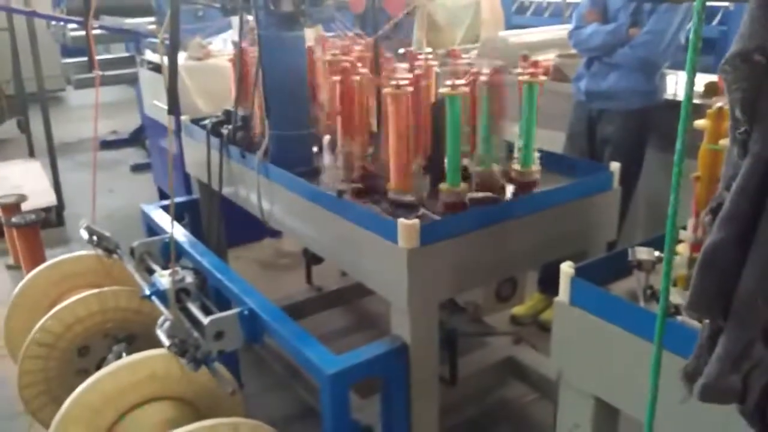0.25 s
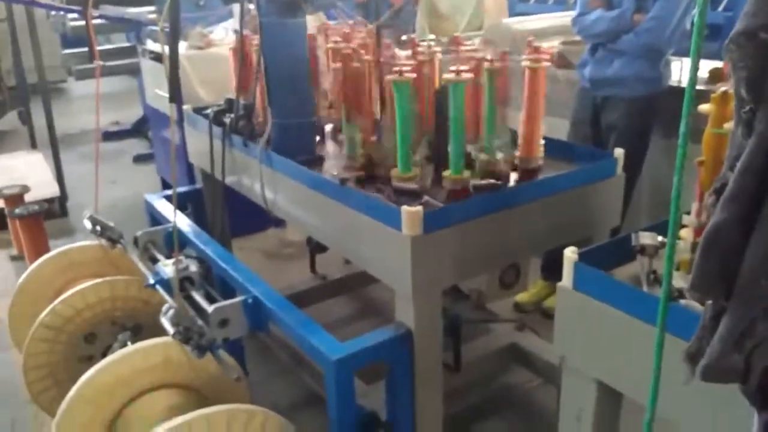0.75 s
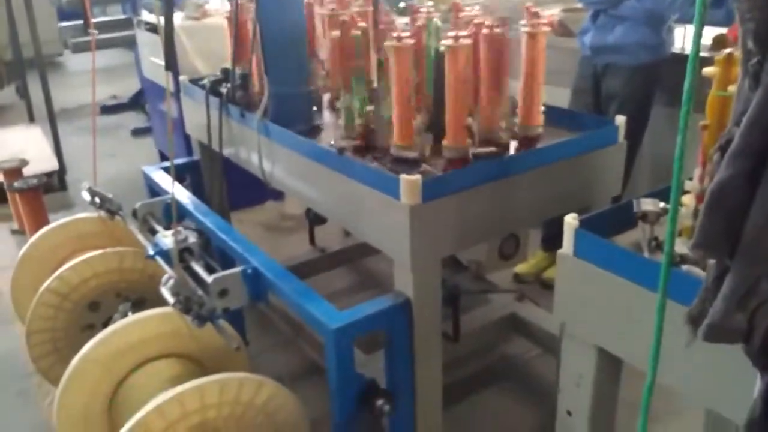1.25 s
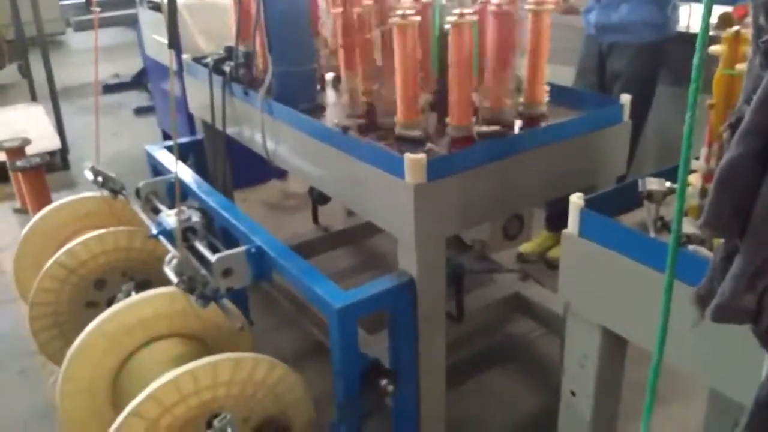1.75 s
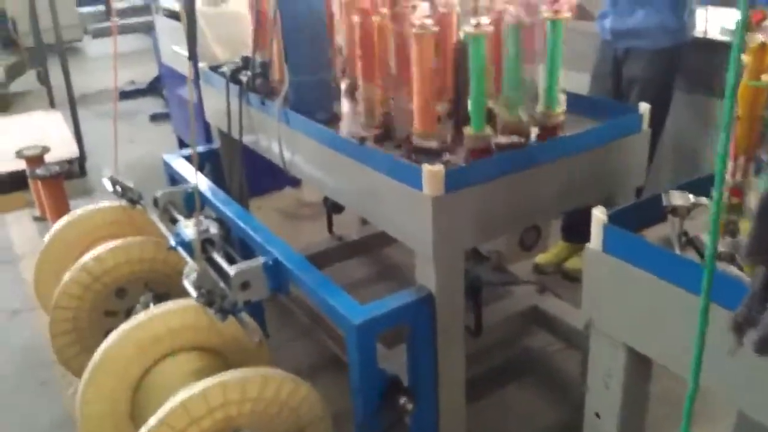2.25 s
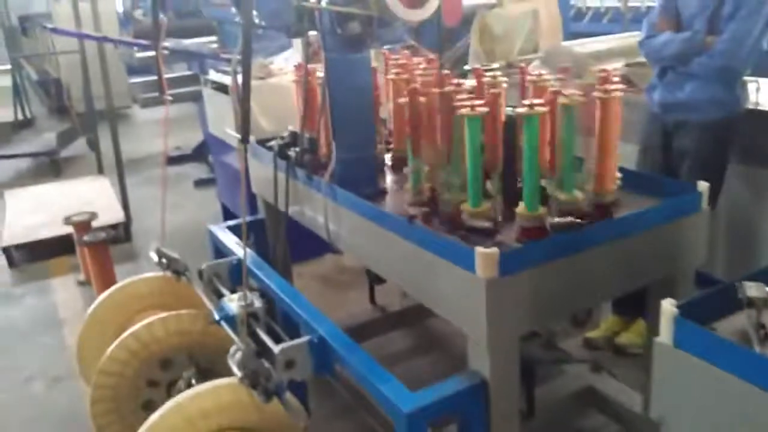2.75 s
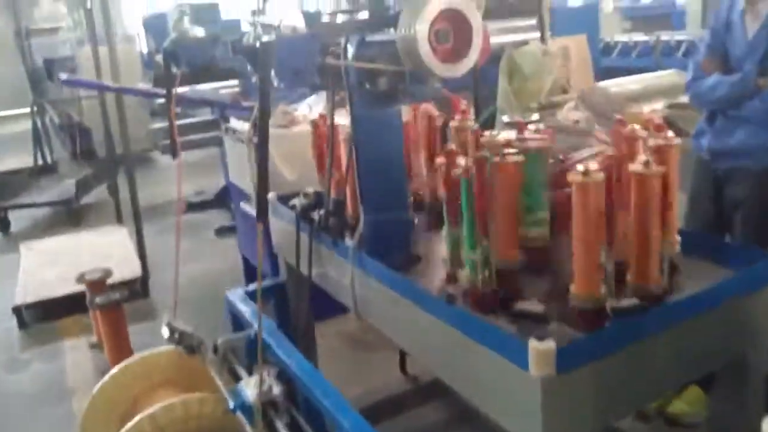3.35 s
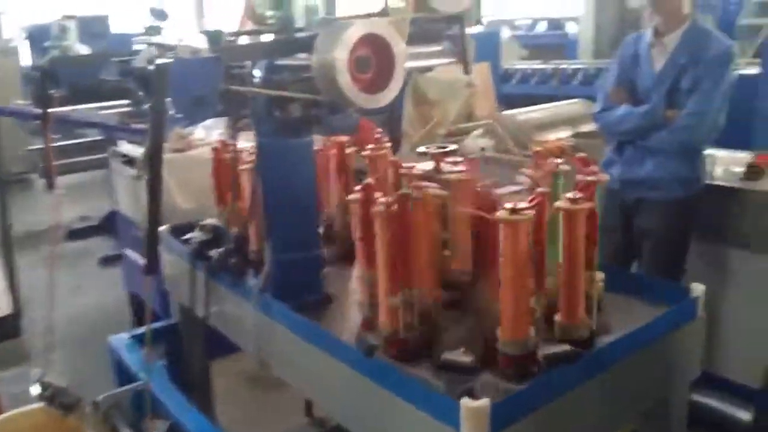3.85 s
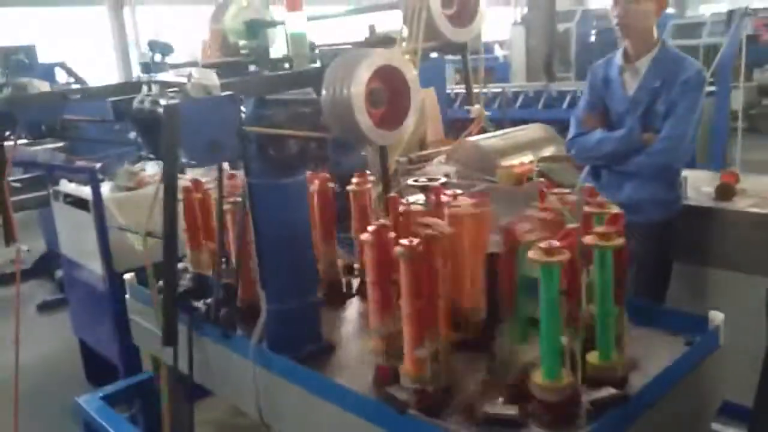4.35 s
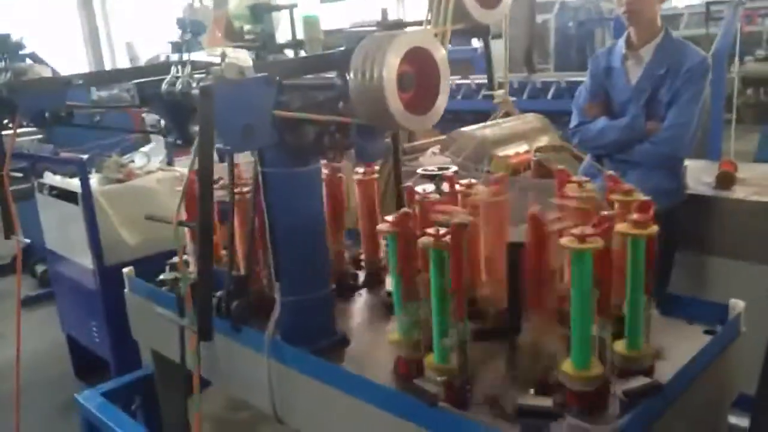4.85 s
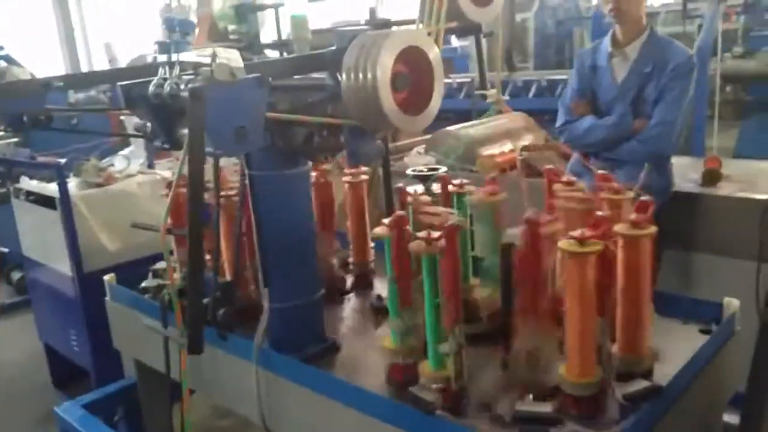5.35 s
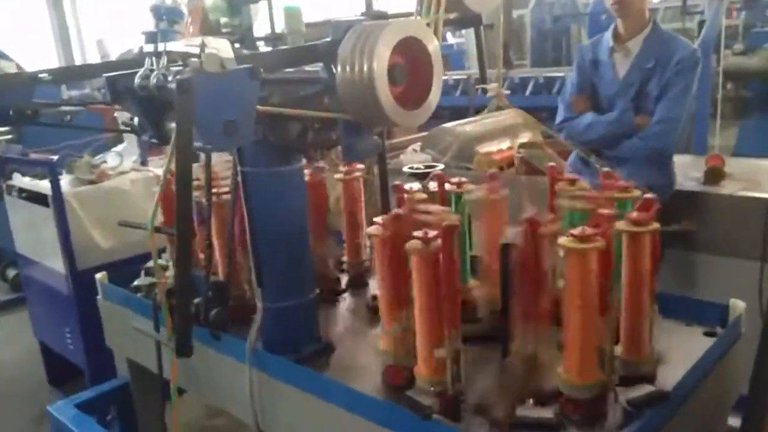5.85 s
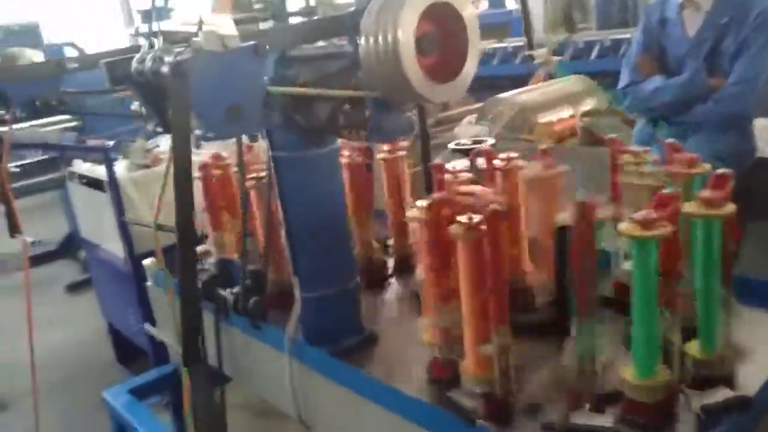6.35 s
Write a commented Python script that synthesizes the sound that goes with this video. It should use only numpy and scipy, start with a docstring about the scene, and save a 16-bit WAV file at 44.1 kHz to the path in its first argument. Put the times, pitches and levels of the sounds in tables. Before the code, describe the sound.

Loud, dense mechanical din in a hall of running braiding machines. Loose steel parts knock and ring in a quick regular pulse, with hissy metal scraping, bright clanks and occasional faint spindle squeals. Beneath lies a wavering drone with booms and soft thumps. The noise never stops; as the microphone is carried toward the machine, clatter, scrape and throb come forward over the background roar.

```python
"""In a factory hall, rope braiding machines run at full speed; the microphone is carried up to one of them.
Its horn gears hand the bobbin carriers on six times a second: random contacts ring the steel as clatter
and bright scraping, and bobbins rattle, spindles sing and slots knock through resonances.
The deck plate booms from driven modes and wandering sines, dull thuds follow the drops, the drive gears hum
as an uneven tone, and the other machines fill the hall with a steady din of coloured noise."""
import sys
import numpy as np
from scipy import signal
from scipy.fft import rfft, irfft, next_fast_len
from scipy.io import wavfile
from scipy.ndimage import uniform_filter1d

SR = 44100
rng = np.random.default_rng(int(sys.argv[2]) if len(sys.argv) > 2 else 0)


def int16_out(signal):
    """Quantize to a 16-bit WAV file."""
    q = np.round(np.clip(np.atleast_2d(signal).T, -1, 1) * 32767)
    wavfile.write(sys.argv[1], SR, q.astype(np.int16))


N = 291060
TIME = np.arange(N) / SR
FREQS = np.maximum(np.arange(N // 2 + 1) * SR / N, 1)

HANDOVERS_PER_S = 6.077
ACCENT_EVERY = 3  # handovers
MESH_HZ = 362.92
CUTOFF_HZ = 14150
TURN = TIME * HANDOVERS_PER_S % 1  # share of the handover cycle

# In every handover the carriers catch in the gear slots.
# Each row: share of the cycle, relative impact in dB, relative gear load in dB.
CATCHES = [(0.132, 2, 1), (0.44, 1.5, -1.5), (.66, -9, -3)]


def clatter(near, far_db=-19.5, closer_db=-1.2, knock_db=-3.0, ring_db=-5.0, catch_db=-4.0, catch_t60=0.68):
    """Loose carriers knock in the track and set the steel parts ringing; the catches drive them harder."""
    # Modes of carriers, spindles and track. Each row: Hz, width in Hz, relative dB from afar, and close by.
    steel_modes = [(859, 60, -7.5, -4.5), (953, 76, -10.5, -2), (1181, 46, -5.5, -7.5),
                   (1266, 25, -1.5, -14), (1361, 32, -7.5, 1), (1508, 120, -18, 5.5), (2086, 45, -23, -19),
                   (2312, 50, -7.5, -6), (4160, 83, -10.5, -13.5)]
    # Colour of the knocks. Each row: Hz, relative level in dB per Hz.
    knock_colour = [(150, -36), (220, -4.5), (420, -1), (600, -4.5), (800, 2), (1050, -2.5), (1350, 6),
                    (1620, 5.5), (1900, 2), (2450, -0.5), (3000, -4), (3700, -5), (5000, -9), (9000, -45)]
    touches = contacts(per_s=750, spread_db=3.0, t60=.06, patchy_db=11.0, surge_db=3.0, count=8)
    taps = from_db(-3.0) * pings(per_s=200, low_hz=800, high_hz=2800, t60=.1)
    knocks = colour(touches, knock_colour) + taps
    rings = body(noise(), steel_modes, near, flicker_db=2.9)

    jolts = from_db(catch_db) * blows(catches(uneven_db=-2.0, late_s=0.015))
    force = from_db(far_db + closer_db * near) * np.hypot(1, dying(jolts ** 2, catch_t60))
    return force * (from_db(knock_db) * knocks + from_db(ring_db) * rings)


def scrape(near, slide_db=-47.5, drag_db=-34, drag_t60=0.46, closer_db=6.5):
    """Carrier feet chatter along the track, drag hard after each catch and ease off, with bright clanks."""
    # Colour of the steel scrape. Each row: Hz, relative level in dB per Hz.
    scrape_colour = [(1500, -19), (3000, 11.5), (4800, -0.5), (6500, 1), (8500, -3.5), (11000, -2.5),
                     (14000, -9)]
    touches = contacts(per_s=1300, spread_db=3.0, t60=.03, patchy_db=7.5, surge_db=3.0, count=10)
    taps = from_db(-4.5) * pings(per_s=300, low_hz=4400, high_hz=14000, t60=.07)
    grabs = blows(catches(uneven_db=0.8, late_s=0.006, accent_db=0.5))
    drag = uniform_filter1d(dying(grabs ** 2, drag_t60), int(.02 * SR))
    force = from_db(closer_db * near) * np.hypot(from_db(slide_db), from_db(drag_db) * drag)
    snaps = from_db(-4.5) * clanks(t60=.09, ping_db=0.0)
    return colour(force * (touches + taps) + snaps, scrape_colour)


def clanks(t60, ping_db, usual_db=-32.0, low_hz=4500, high_hz=12500, attack_s=0.0063, count=4):
    """A carrier snapping home: a bright burst with a few steel pings of its own."""
    # The hardest snaps into a slot. Each row: start in seconds, relative level in dB.
    hardest = [(0.051, -17.5), (0.68, -22), (0.732, -22), (2.001, -26), (2.491, -26), (2.534, -19),
               (2.871, -21), (3.478, -23), (3.971, -20), (3.999, -21), (4.354, -24), (4.545, -23),
               (5.124, -28), (5.618, -24), (5.782, -23), (5.945, -30), (6.012, -23), (6.111, -19),
               (6.162, -22), (6.329, -24), (6.441, -18)]
    usual = catches(uneven_db=0.5, late_s=0.0079, accent_db=4.0) + [0, usual_db]
    age, out = TIME[:SR // 5], np.zeros((2, N + SR))
    for s, db in np.vstack([hardest, usual]):
        hz = rng.uniform(low_hz, high_hz, (count, 1, 1))
        tones = np.sin(2 * np.pi * (hz * age + rng.random((count, 2, 1))))
        steel_pings = tones.sum(0) / np.sqrt(count / 2)
        burst = rng.standard_normal((2, len(age))) + from_db(ping_db) * steel_pings
        height = np.minimum(age / attack_s, 1) * from_db(db - 60 * age / t60)
        out[:, max(int(s * SR), 0):][:, :len(age)] += burst * height
    return out[:, :N]


def slots(near, level_db=-28.5, share=0.41, t60=0.26):
    """Mid-cycle a carrier hits the end of its slot: a hollow knock and a high ring that soon dies away."""
    # The wall of a gear slot. Each row: Hz, width in Hz, relative dB from afar, relative dB close by.
    wall_modes = [(497, 140, 0.5, 6), (4172, 83, 4, -2)]
    hits = blows(each_handover(share, level_db, uneven_db=2.5, late_s=0.004))
    force = dying(hits ** 2, t60)
    return body(force * noise(), wall_modes, near) * np.sqrt(np.mean(force ** 2))


def rattles(level_db=-1.5, width_hz=260, rise_s=0.012, knocks_per_s=260, knock_t60=0.051):
    """A jolted bobbin chatters on its spindle: a short run of uneven knocks into one steel resonance."""
    # Each row: start in seconds, level in dB before level_db, resonance in Hz.
    jolted = [(0.0, -16.5, 1290), (0.246, -19, 1200), (0.655, -19.5, 1310), (1.071, -19, 1220),
              (1.27, -24, 1299), (1.431, -21, 1250), (1.635, -22, 1370), (2.07, -21, 1240),
              (2.14, -18, 1270), (3.357, -21.0, 1340), (3.948, -18, 1310), (4.11, -16.5, 1980),
              (4.39, -21.5, 2080), (4.615, -19, 1380)]
    age, out = TIME[:SR // 6], np.zeros((2, N + SR))
    height = age / rise_s * np.exp(1 - age / rise_s)
    for s, db, hz in jolted:
        knocks = (rng.random(len(age)) < knocks_per_s / SR) * rng.uniform(.2, 1, len(age))
        grain = height * dying(knocks, knock_t60) * rng.standard_normal((2, len(age)))
        burst = rms_one(resonate(grain, hz, width_hz)) * np.sqrt(np.mean(height ** 2))
        out[:, max(int(s * SR), 0):][:, :len(age)] += from_db(db + level_db) * burst
    return out[:, :N]


def squeals(level_db=-27.5, width_hz=20):
    """A dry spindle sings briefly: noise in a narrow resonance wavers in pitch, swelling and fading."""
    # Each row: start in seconds, length in seconds, pitch in Hz.
    songs = [(0.0, 0.16, 1730), (0.6, 0.26, 850), (0.926, 0.19, 1747), (0.99, 0.18, 850), (1.2, 0.18, 1750),
             (1.854, 0.15, 1784), (2.049, 0.18, 1745), (4.68, 0.32, 858), (5.72, 0.45, 1440)]
    out = np.zeros((2, N + SR))
    for s, length, hz in songs:
        size = int(length * SR)
        # the resonance gets a tenth of a second to build up unheard
        tone = rms_one(resonate(rng.standard_normal((2, size + SR // 10)), hz, width_hz)[:, -size:])
        out[:, max(int(s * SR), 0):][:, :size] += from_db(level_db) * signal.windows.tukey(size) * tone
    return out[:, :N]


def deck(near, level_db=-29, far_throb_db=0.5, closer_throb_db=3.5, peak_share=0.78):
    """The circling carriers shake the plate's modes, throbbing with the handovers, more deeply close by."""
    # The deck plate. Each row: Hz, width in Hz, relative dB from afar, relative dB close by.
    plate_modes = [(201, 52, -31, -14), (265.7, 5.2, -8.5, -6), (303, 7.9, -20, 1),
                   (326.2, 18.5, -18.5, 14.5), (336, 18, -1, -8), (349.6, 20, 0, -4), (386.4, 13.5, 1, -42),
                   (459, 24, -17, -4)]
    throb = from_db((far_throb_db + closer_throb_db * near) * sway(peak_share))
    return from_db(level_db) * body(noise() * throb, plate_modes, near)


def drone(near, far_db=-36.5, closer_db=5.5, hz=322, wander_radians=1.78, wander_rate=6.6, throb_db=1.5,
          peak_share=0.72, lurch_share=1.0, lurch_db=10.0, rise_s=0.0077):
    """The plate's strongest mode never stops sounding; it swells with a lurch at the end of each handover."""
    lurches = swells(each_handover(lurch_share, lurch_db, uneven_db=-1.0, late_s=0.0126), rise_s)
    swelling = np.hypot(from_db(throb_db * sway(peak_share)), lurches)
    height = np.sqrt(2) * from_db(far_db + closer_db * near) * swelling
    return height * np.sin(2 * np.pi * hz * TIME + wander_radians * drift(wander_rate))


def booms(level_db=-2.5, rise_s=0.015, sag_hz_per_s=100):
    """A heavy lurch makes the plate boom at a pitch of its own, which sags as the load passes."""
    # The heaviest lurches. Each row: start in seconds, level in dB before level_db, pitch at the peak in Hz.
    lurches = [(0.145, -20, 350), (0.978, -18, 351), (1.103, -17, 323), (2.412, -17, 333),
               (2.566, -17, 340), (3.08, -22, 329), (3.256, -17.5, 334), (3.46, -25, 377),
               (3.882, -16.5, 331), (4.414, -21, 318), (4.762, -20, 324), (5.035, -17.5, 339),
               (5.104, -18, 369), (5.259, -18, 322), (5.396, -20, 307), (5.717, -14, 319),
               (5.894, -18.5, 305), (5.93, -21, 357), (6.08, -22, 330), (6.25, -17.5, 350),
               (6.353, -18.5, 331), (6.41, -17.5, 332)]
    age, out = TIME[:SR // 5], np.zeros(N + SR)
    height = np.sqrt(2) * age / rise_s * np.exp(1 - age / rise_s)
    for s, db, hz in lurches:
        turns = rng.random() + np.cumsum(hz - sag_hz_per_s * (age - rise_s)) / SR
        out[max(int(s * SR), 0):][:len(age)] += from_db(db + level_db) * height * np.sin(2 * np.pi * turns)
    return out[:N]


def thuds(near, closer_db=6.5, t60=0.2):
    """Twice a cycle the carriers' weight drops onto the next gears, first lightly, then hard."""
    # Each row: share of the cycle, level in dB from afar.
    drops = [(0.19, -37), (0.51, -33)]
    # Colour of a drop. Each row: Hz, relative level in dB per Hz.
    thud_colour = [(90, -52), (150, 0), (195, 13.5), (240, 7), (330, -6), (700, -10)]
    force = sum(blows(each_handover(share, db, uneven_db=0.4)) for share, db in drops)
    return from_db(closer_db * near) * colour(dying(force ** 2, t60) * noise(), thud_colour)


def thumps(level_db=-2.5, hz=198, rise_s=0.011):
    """The heaviest drops thump the frame: a few dull cycles, never quite at the same pitch."""
    # Each row: start in seconds, level in dB before level_db.
    heaviest = [(0.253, -30.5), (0.567, -36), (1.368, -31.5), (1.56, -30), (1.893, -33), (2.053, -33),
                (2.214, -31.5), (2.547, -35), (3.043, -36), (3.537, -30), (3.7, -32), (3.868, -33),
                (4.525, -31.5), (5.018, -33), (5.185, -33), (5.52, -28)]
    return from_db(level_db) * swells(heaviest, rise_s) * np.sin(2 * np.pi * hz * TIME + drift(7.8))


def gears(near, level_db=-39, far_lag_radians=0.6, lag_share=0.27, load_db=10.5, rise_s=0.014, lead_s=0.018,
          wander_radians=0.4, wander_rate=6.7):
    """Tooth hum swells as the gears push; they lag and catch up, a dip in pitch that is plainer close by."""
    pushes = sum(swells(each_handover(share, load_db + db, uneven_db=3.0), rise_s)
                 for share, _, db in CATCHES)
    # the push comes a little ahead of the catch
    height = np.sqrt(2) * from_db(level_db) * (1 + np.interp(TIME + lead_s, TIME, pushes))
    lag = far_lag_radians * (1 + 2 * near) * sway(lag_share)
    return height * np.sin(2 * np.pi * MESH_HZ * TIME + lag + wander_radians * drift(wander_rate))


def hall(din_db=-19.5):
    """The other machines, smeared into a smooth din by the hall."""
    # Colour of the din. Each row: Hz, relative level in dB per Hz.
    din_colour = [(20, -48), (60, -45.5), (105, -39), (150, -20), (195, -13.5), (240, -11.5), (330, 1),
                  (560, -8.5), (850, -3), (1500, 4), (2400, -2.5), (3600, -11), (6000, -17.5), (14000, -30)]
    return from_db(din_db) * colour(noise(), din_colour)


def spread(pair):
    """Two unrelated sound fields are mixed to the microphone's two sides, their likeness set by frequency."""
    # Each row: Hz, likeness of left and right from -1 to 1, left minus right in dB.
    stereo_field = [(60, 0.32, -2), (161, 0.46, 2.5), (350, 0.5, -2.5), (564, 0.76, -3), (850, 0.84, -2.5),
                    (1160, 0.39, -2.5), (1590, -0.57, 3.5), (1840, 0.083, 2.5), (2600, 0.23, 2.5),
                    (3670, -0.12, -0.5), (7000, -0.028, 0), (14000, -0.077, 0)]
    alike, tilt_db = over_hz(stereo_field)
    alike = np.clip(alike, -.98, .98)
    sides = np.array([[1], [-1]])
    mid, side = rfft(pair)
    mixed = np.sqrt(1 + alike) * mid + sides * np.sqrt(1 - alike) * side
    return irfft(mixed * from_db(sides * tilt_db / 2), N) / np.sqrt(2)


def each_handover(share, db, uneven_db, late_s=0, accent_db=0):
    """Rows (s, dB) of a blow in every cycle, never quite alike; every third gains accent_db."""
    cycle = np.arange(int(N / SR * HANDOVERS_PER_S))
    late, hard = np.clip(rng.standard_normal((len(cycle), 2)), -2, 2).T
    times = (cycle + share) / HANDOVERS_PER_S + late_s * late
    return np.column_stack([times, db + uneven_db * hard + accent_db * (cycle % ACCENT_EVERY == 0)])


def catches(uneven_db, late_s=0, accent_db=0):
    """Rows (s, dB) of all the catches of all handovers."""
    return np.vstack([each_handover(share, db, uneven_db, late_s, accent_db) for share, db, _ in CATCHES])


def blows(rows):
    """One impulse for each row (s, dB)."""
    s, db = np.transpose(rows)
    return np.bincount(np.clip((s * SR).astype(int), 0, N - 1), from_db(db), N)


def swells(rows, rise_s):
    """Each row (s, dB) builds up to its height and sinks back."""
    age = TIME[:SR // 2] / rise_s
    return signal.fftconvolve(blows(rows), age * np.exp(1 - age))[:N]


def dying(power, t60):
    """Height of the scattered sound that follows blows of the given power, 60 dB down after t60 seconds."""
    return np.sqrt(signal.lfilter([1], [1, -from_db(-120 / (t60 * SR))], power + 1e-18))


def sway(peak_share):
    """Rises and falls once per handover, between -1 and 1."""
    return np.cos(2 * np.pi * (TURN - peak_share))


def drift(rate):
    """A smooth random wander of spread 1: noise at 200 knots a second, smoothed above rate in Hz."""
    knots = rng.standard_normal(int(N / SR * 200) + 400)
    r = np.exp(-2 * np.pi * rate / 200)
    slow = signal.lfilter([1], [1, -2 * r, r * r], knots)[300:]
    return np.interp(TIME * 200, np.arange(len(slow)), rms_one(slow))


def contacts(per_s, spread_db, t60, patchy_db, surge_db, count):
    """Loose parts touch at random; each has its own colour and dense ring, and surges as it swings past."""
    age, size, heard = TIME[:4096], next_fast_len(N + 4096, True), 0
    octave = np.log2(1 + np.arange(size // 2 + 1, dtype=np.float32))
    for part in range(count):
        at = rng.integers(0, N, int(per_s / count * N / SR))
        force_db = spread_db * np.clip(rng.standard_normal(len(at)), -2, 2) + surge_db * np.tanh(drift(5)[at])
        touches = np.bincount(at, from_db(force_db) * rng.choice([-1, 1], len(at)), N)
        own_colour = from_db(patchy_db * np.cos(2 * np.pi * (octave + part / count)))
        ring = rfft(np.float32(rng.standard_normal((2, len(age))) * from_db(-60 * age / t60)), size)
        evened = ring / uniform_filter1d(abs(ring), size=len(octave) // 64)
        heard = heard + rfft(np.float32(touches), size) * evened * own_colour
    return rms_one(irfft(heard, size)[:, :N].astype(float))


def pings(per_s, low_hz, high_hz, t60):
    """Small steel parts are tapped at random, most lightly; each rings briefly at a pitch of its own."""
    age, out = np.float32(TIME[:SR // 13]), np.zeros((2, N + SR))
    shape = from_db(-60 * age / t60) * np.minimum(age * 1000, 1)  # full height after 1 ms
    for when, pitch, size, left, right in rng.random((int(per_s * N / SR), 5)):
        hz = np.float32(low_hz * (high_hz / low_hz) ** pitch)
        turns = hz * age + np.float32([[left], [right]])
        out[:, int(when * N):][:, :len(age)] += (1 + 2 * size ** 2) * shape * np.sin(2 * np.pi * turns)
    return rms_one(out[:, :N])


def body(drive, modes, near, flicker_db=0):
    """A body's modes: their balance shifts with the listener's place, and with the place it is struck."""
    total = 0
    for hz, width, far_db, near_db in modes:
        mode_db = far_db + near * (near_db - far_db) + flicker_db * np.tanh(drift(11.0))
        total = total + from_db(mode_db) * rms_one(resonate(drive, hz, width))
    return rms_one(total)


def resonate(x, hz, width):
    """Two equal resonances in series: a peak with dark skirts."""
    r = np.exp(-np.pi * width * np.sqrt(2) / SR)
    section = [(1 - r * r) / 2, 0, (r * r - 1) / 2, 1, -2 * r * np.cos(2 * np.pi * hz / SR), r * r]
    return signal.sosfilt([section, section], x + 1e-18)


def colour(x, spectrum):
    """Shape a white excitation and keep its power."""
    return irfft(rfft(x) * rms_one(from_db(over_hz(spectrum)[0])), N)


def noise():
    """Two unrelated white noises."""
    return rng.standard_normal((2, N))


def over_hz(rows):
    """Every column of a table along the log-frequency axis."""
    hz, *columns = np.transpose(rows)
    return [np.interp(np.log(FREQS), np.log(hz), c) for c in columns]


def columns_at(rows, where):
    """Every column of a table, joined by straight lines."""
    first, *columns = np.transpose(rows)
    return [np.interp(where, first, c) for c in columns]


def from_db(db):
    """Decibels to gain."""
    return 10 ** (np.asarray(db) / 20)


def rms_one(x):
    """Scale to unit power."""
    return x / np.sqrt(np.mean(x ** 2) + 1e-20)


def scene():
    """The near machine, growing closer with the walk, in the din of the hall."""
    # The walk up to the machine. Each row: time in seconds, nearness from 0 to 1.
    walk = [(0, 0.08), (2.3, 0), (3.7, 0.23), (4.8, 0.51), (6.6, 0.69)]
    near = np.clip(columns_at(walk, TIME)[0], 0, 1)
    steel = clatter(near) + slots(near) + rattles() + squeals() + scrape(near)
    field = spread(deck(near) + thuds(near) + steel + hall())
    hum = (drone(near) + booms() + gears(near)) * from_db([[-.6], [.6]])  # a little to the right
    return field + hum + thumps()


def record(dry):
    """The highest peaks are rounded and the top is cut steeply."""
    rounded = dry / (1 + (dry / .85) ** 12) ** (1 / 12)
    return signal.sosfilt(signal.ellip(12, .1, 80, CUTOFF_HZ, fs=SR, output="sos"), rounded)


dry = scene()
out = record(dry)
int16_out(out)
```